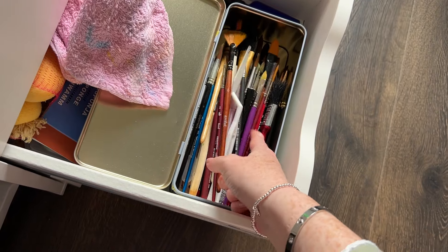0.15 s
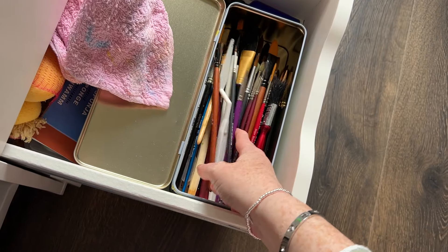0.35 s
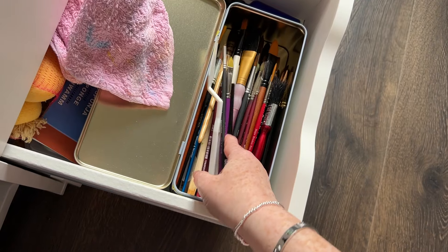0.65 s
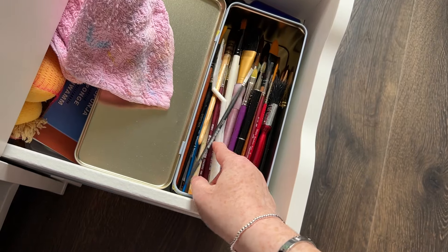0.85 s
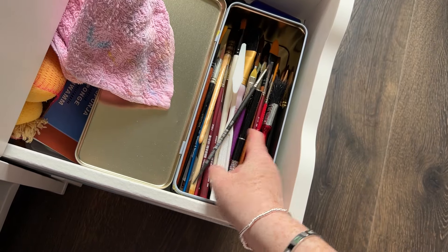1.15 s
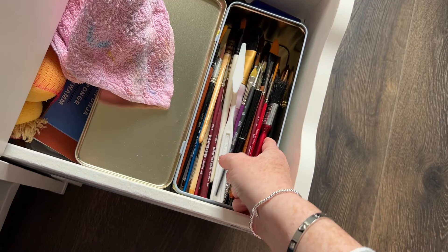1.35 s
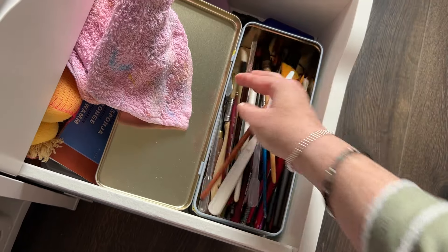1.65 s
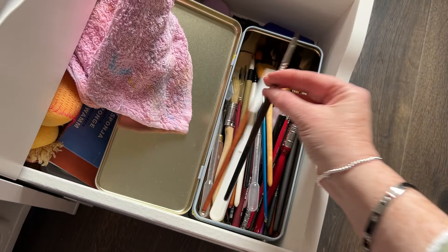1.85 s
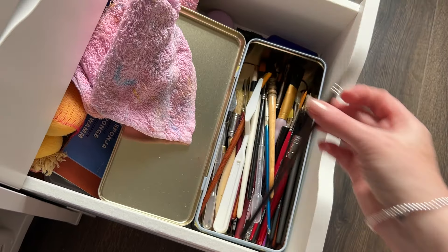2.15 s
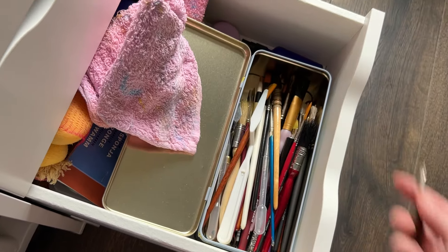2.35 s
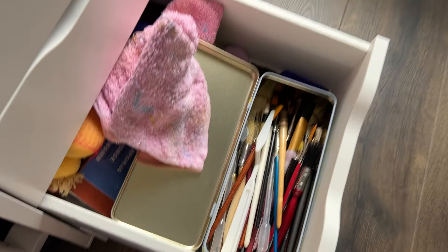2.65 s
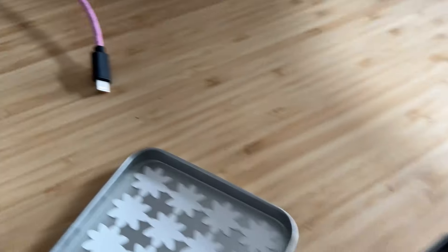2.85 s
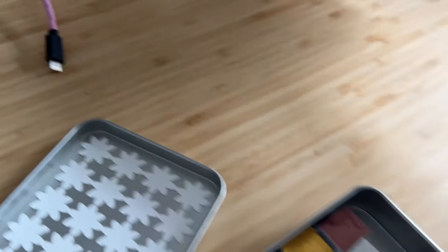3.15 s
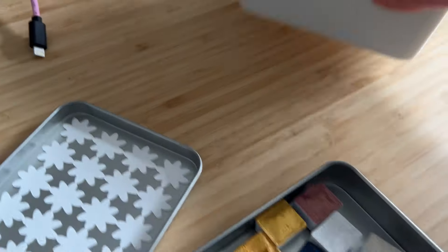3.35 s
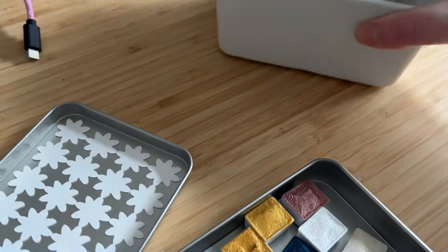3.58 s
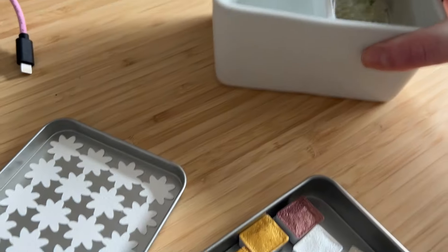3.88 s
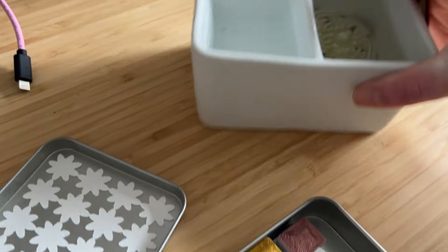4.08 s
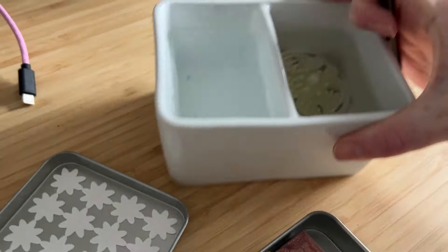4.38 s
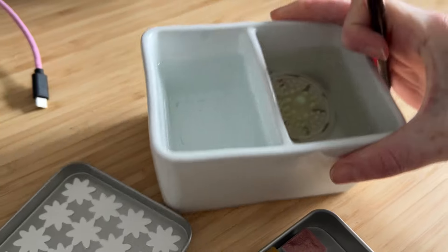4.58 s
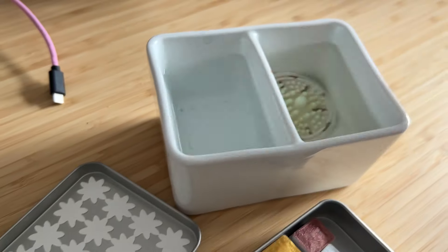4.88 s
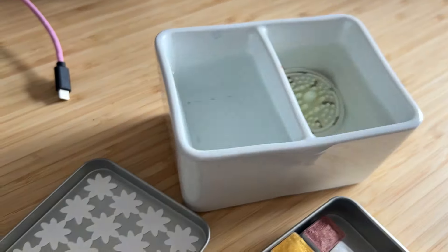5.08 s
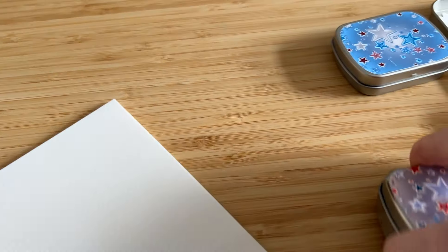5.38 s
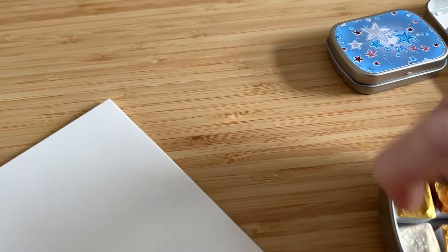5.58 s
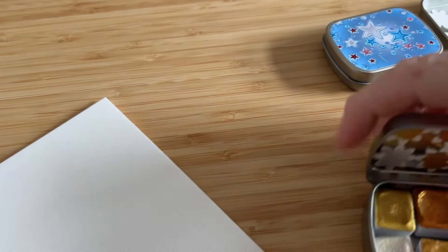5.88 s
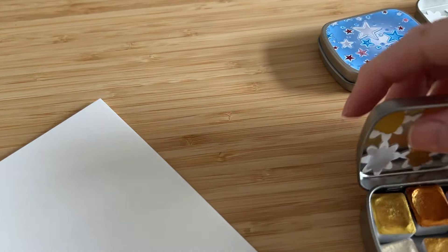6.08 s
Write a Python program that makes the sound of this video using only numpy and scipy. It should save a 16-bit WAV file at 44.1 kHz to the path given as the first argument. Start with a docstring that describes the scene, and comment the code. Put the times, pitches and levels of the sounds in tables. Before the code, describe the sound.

In a small quiet room, close up, fingers stir wooden and plastic paintbrushes in a metal tin in quick bursts of sharp clacks, with a low drawer rumble beneath. After a near-silent pause a ceramic water pot knocks hard on a wooden desk, grinds along it and stops. Lastly a small metal paint tin taps down, its lid is scraped loose and drops back with a crisp knock.

```python
"""Paintbrushes clack and clatter in a metal tin in a drawer: snaps through bright handle resonances,
hollow tin knocks, and dense random grains for the stirring, with a few sine pings of thin metal.
A ceramic water pot then knocks on a wooden desk, grinds along it and settles with a few faint thumps: decaying
desk modes, filtered bursts and grains that follow the speed. A small paint tin is put down and opened, and its
lid drops back: knocks, a scrape and a singing hinge. A small room, heard through two close microphone ports."""
import sys
import numpy as np
from scipy import signal
from scipy.fft import rfft, irfft
from scipy.io import wavfile

SR = 44100
rng = np.random.default_rng(int(sys.argv[2]) if len(sys.argv) > 2 else 0)


def put_to_file(sound):
    """Save the sound as 16-bit audio at rate SR, in the file named by the first command-line argument."""
    columns = np.atleast_2d(sound).T  # one column per channel
    safe = np.clip(columns, -1, 1)
    whole_steps = np.round(safe * 32767)
    wavfile.write(sys.argv[1], SR, whole_steps.astype(np.int16))


N = 274743
TIME = np.arange(N) / SR

# quiet room noise, spectral shape: freq_hz, level_db
FLOOR_SPECTRUM = [(55, 7), (250, -13), (600, -21.5), (1250, -14), (2300, -24.5), (6000, -35), (13000, -32),
                  (16000, -40)]
FLOOR_DB = -60
# low room rumble, spectral shape: freq_hz, level_db
FLOOR_RUMBLE_SPECTRUM = [(55, 5.5), (90, -3.5), (400, -37.5), (1500, -66)]

# resonances of one brush handle: multiple of its ring frequency, boost_db
HANDLE_RESONANCES = [(.52, 8), (1, 13), (1.6, 9)]
HANDLE_WIDTH_HZ = 430
# broad spectrum under the handle resonances: freq_hz, level_db
TICK_SPECTRUM = [(300, -23), (1500, -13.5), (3500, -11.5), (15500, -3.5)]
# bending modes of a free bar: multiple of the first
FREE_BAR_RATIOS = [1, 2.76, 5.4, 8.93, 13.3]
# resonances of the brush tin: freq_hz, width_hz, boost_db
BRUSH_TIN_RINGS = [(300, 40, 3.3), (528, 56, 4.6), (950, 87, 5), (1660, 61, 2.5), (2540, 170, 4.9)]

# strokes of the fingers through the brushes, levels ahead of the layer trims:
# start_s, length_s, clatter_db, drawer_rumble_db
STROKES = [(-0.02, 0.14, -33, -45), (.18, 0.11, -22, -43), (.435, 0.13, -25.5, -49.5),
           (.68, 0.066, -35, -47.5), (.77, 0.054, -24, -41.5), (.935, .13, -40, -44),
           (1.18, 0.069, -56, -55.5), (1.385, 0.2, -48, -67), (1.48, 0.12, -24, -35.5),
           (1.675, 0.056, -28.5, -41), (1.81, 0.068, -26.5, -35.5)]
# a stroke gathers the handles, then they settle; the drawer takes longer to come to rest
STROKE_ATTACK_S, SETTLE_T60_S, DRAWER_T60_S = 0.03, 0.098, 0.3
# stray ticks between handles: rate, level against the small knocks, range of their rings
STRAY_PER_S, STRAY_DB, STRAY_LOW_HZ, STRAY_HIGH_HZ = 150, -8.5, 6500, 9400
# broad spectrum of the small knocks: freq_hz, level_db
CLATTER_SPECTRUM = [(40, -16), (150, -6), (400, 3), (1000, -2), (2000, -7), (4500, -6), (8000, -10),
                    (15000, -20)]
# broad spectrum of the jostled drawer: freq_hz, level_db
DRAWER_SPECTRUM = [(30, -14.5), (70, 6.5), (130, -4.0), (300, -1), (450, -5.0), (900, -32.0), (3000, -60.5)]

# clearest clacks of brush handles; the knock is that of what they lie against:
# start_s, tick_db, knock_db, ring_hz
BRUSH_CLACKS = [(0.039, -25.5, -45.5, 6630), (0.088, -17.5, -25.5, 6530), (0.1753, -8, -24, 7258),
                (0.235, -23, -17.5, 7746), (0.2596, -19, -16.5, 8810), (0.448, -7.5, -8.5, 9360),
                (0.451, -13.5, -2.5, 8070), (0.46, -15.5, -27, 9260), (0.536, -18, -25.5, 7356),
                (0.556, -27.5, -14, 9170), (0.72, -35.5, -18, 6670), (0.7602, -15, -32, 8034),
                (0.7978, -27.5, -22, 7776), (0.836, -26, -16.5, 7870), (0.867, -26, -40.5, 6650),
                (0.9742, -23, -44.5, 7780), (1.015, -42, -26.5, 7570), (1.031, -33, -31, 7210),
                (1.052, -28, -26.5, 6630), (1.187, -50, -34.5, 7700), (1.505, -26.5, -30, 8790),
                (1.5514, -11, -24.5, 8380), (1.677, -49, -21.5, 6600), (1.716, -19.5, -33.5, 9070),
                (1.843, -44.5, -20, 7000), (1.9405, -20.5, -19, 8500), (1.998, -36.5, -33.5, 8120),
                (3.0281, -44, -70.5, 9410), (3.422, -65.5, -57, 8620), (4.0103, -35, -26.5, 9300),
                (4.4934, -23.5, -20, 7860), (4.6136, -23, -25, 9070)]
SNAP_T60_S = 0.013
# broad spectrum of the hollow knock: freq_hz, level_db
BRUSH_TIN_SPECTRUM = [(40, -23.5), (120, -17), (220, -9.5), (450, 2), (800, -5), (1500, -2.5), (2100, -7.5),
                      (3000, -5), (5000, -4.5), (15000, -23)]
# light metallic pings: start_s, pitch_hz, level_db, t60_s
PINGS = [(1.186, 4950, -52, .3), (1.94, 3058, -41, .14), (3.105, 2900, -53, .08)]

# modes of the desk top before damping: freq_hz, level_db, t60_s
DESK_MODES = [(64.6, -8, .2), (92, -6, .1), (120, -1, .4), (167, -4, .3), (198, -4, .14), (283, -2, .22),
              (325, -7, .18), (359, -5, .14), (440, -2, .12), (538, -6, .1)]
# the pot meeting the desk: start_s, thump_db, crack_db, brightness_hz, factor on the desk's ring time
POT_KNOCKS = [(3.4886, -5.5, -4.5, 4200, 0.98), (3.7102, -12, -18.5, 700, 0.79),
              (3.743, -7.5, -9, 2440, 0.72), (3.828, -22, -29.5, 1180, 1), (4.745, -43, -64.5, 297.6, 0.47),
              (4.885, -50, -81.5, 300, 0.17), (4.94, -54, -80.5, 300, 0.17)]
# broad spectrum of the pot: freq_hz, level_db
POT_SPECTRUM = [(50, -10.5), (200, -8), (450, 10.5), (750, 2), (1100, -1), (1700, -6.5), (2800, -15),
                (4500, -22), (7000, -30.5), (15000, -36)]
# the pot is pushed once, slows down and stops: time_s, speed (0 to 1)
PUSH = [(3.84, 0.2), (3.95, .75), (4.17, 0.9), (4.48, .45), (4.64, 0.44), (4.70, 0.09)]
# layers of the slide: level at speed 1, and the power of speed that each follows
GRIND_DB, GRIND_POWER = -23.5, 1.37
GRIT_DB, GRIT_POWER = -38.5, 1.9
SHUDDER_DB, SHUDDER_POWER = -30.5, 0.54
# broad spectrum of the grind: freq_hz, level_db
GRIND_SPECTRUM = [(80, -18), (250, -7.5), (450, 1), (700, -3.5), (1100, -5), (2400, -13), (5000, -29),
                  (15000, -49.5)]
# resonances of the grind: freq_hz, width_hz, boost_db
GRIND_RINGS = [(474, 55, 9), (791, 30, 5), (1010, 40, 5), (1670, 50, 4), (2170, 150, 3)]
# broad spectrum of the fine grit: freq_hz, level_db
GRIT_SPECTRUM = [(1500, -18), (4500, 4.5), (6700, -2.5), (7800, -6), (8400, -5), (9100, -5), (15500, 0)]
# broad spectrum of the shaken desk: freq_hz, level_db
SHUDDER_SPECTRUM = [(30, -28.5), (70, -12.5), (125, -12), (200, -1.0), (350, -20.5), (1500, -67.0)]
# resonances of the shaken desk: freq_hz, width_hz, boost_db
SHUDDER_RINGS = [(108.5, 7.9, 27.8), (170.0, 12, 15)]

# the paint tin and its lid: start_s, thump_db, crack_db, hollow_hz of the struck part, rattle_t60_s
TIN_KNOCKS = [(5.185, -31, -27.5, 2274, 0.236), (5.3145, -37, -29, 810, 0.03),
              (5.345, -53.5, -41, 2260, 0.044), (5.658, -44.5, -61.5, 600, 0.035),
              (5.863, -28.5, -15.5, 1258, 0.09), (5.893, -26, -25.5, 4030, 0.024)]
# broad spectrum of the paint tin: freq_hz, level_db
PAINT_TIN_SPECTRUM = [(50, -8.5), (180, -0.5), (550, -5.5), (1300, -10), (3000, -10), (3700, -18),
                      (5000, -18.5), (15000, -39)]
# resonances of the paint tin: freq_hz, width_hz, boost_db
PAINT_TIN_RINGS = [(547.8, 27, 13.3), (820, 40, 7.3), (1230, 17, 3.6), (1414, 20.8, 1.7), (2160, 68, 3.74),
                   (2890, 90, 7), (4270, 149, 5.9)]
# fingers scraping at the lid: start_s, length_s, level_db
LID_SCRAPES = [(5.29, .06, -43), (5.50, .045, -41), (5.72, 0.27, -49)]
SCRAPE_ATTACK_S, SCRAPE_T60_S = 0.022, 0.398
# broad spectrum of the scrape: freq_hz, level_db
SCRAPE_SPECTRUM = [(60, 6.5), (250, 6.5), (550, 4.0), (1300, -2.5), (2600, -2.5), (4500, -15),
                   (8000, -21.0), (15000, -21.0)]
# the lid turning on its hinge: start_s, length_s, level_db
HINGE_TURNS = [(5.59, 0.055, -49), (6.01, .16, -53)]
HINGE_ATTACK_S, HINGE_T60_S = 0.0302, 0.2
# broad spectrum of the singing lid: freq_hz, level_db
LID_SPECTRUM = [(200, -6), (1200, -6.5), (8000, -16.5), (15000, -27.5)]
# resonances of the thin lid: freq_hz, width_hz, boost_db
LID_RINGS = [(1220, 110, 13), (2150, 140, 8), (2980, 180, 13), (4220, 320, 12), (5200, 260, 8)]

# reverberation time: freq_hz, t60_s
ROOM_T60 = [(100, 0.54), (400, 0.29), (1500, 0.33), (5000, 0.34), (9000, 0.28), (15000, .28)]
# colour of the reverberation: freq_hz, level_db
ROOM_SPECTRUM = [(100, -3), (500, 2), (4000, 2), (8000, -2), (15000, -6)]
# likeness of the two ports: freq_hz, likeness (0 unrelated, 1 identical)
PORT_LIKENESS = [(100, 0.98), (300, 0.97), (650, 0.42), (1500, 1), (2800, 0.17), (5000, .6), (7000, 1)]
# phase by which the left port leads the right: freq_hz, lead_rad
PORT_LEAD = [(20, 0), (300, -.2), (650, -1.1), (950, -.35), (1800, 0), (2900, 2.1), (3900, 1), (5100, 1.2),
             (6000, 3.14), (8050, 6.28), (10300, 9.42), (12600, 12.4), (14800, 15.7)]
EDGE_HZ = 15800  # upper band limit


def amp(db):
    """Decibels to gain."""
    return 10 ** (np.asarray(db) / 20)


def read(points, hz):
    """Reads a spectrum table on a log-frequency axis."""
    table_hz, value = np.transpose(points)
    return np.interp(np.log(hz + 1), np.log(table_hz + 1), value)


def add(mix, start_s, sound):
    """Mixes a sound in at a time."""
    part = mix[:, round(start_s * SR):][:, :sound.shape[1]]
    part += sound[:, :part.shape[1]]


def body(spectrum, rings=(), size=4096):
    """Minimum-phase response of a sounding body, energy 1: a broad spectrum with resonances on it."""
    hz = abs(np.fft.fftfreq(size, 1 / SR))
    gain = amp(read(spectrum, hz))
    for ring_hz, width_hz, boost_db in rings:
        gain = gain * (1 + (amp(boost_db) - 1) / (1 + (2 * (hz - ring_hz) / width_hz) ** 2))
    # the phase that follows from the log gain makes the response causal
    causal_spectrum = np.exp(np.conj(signal.hilbert(np.log(gain))))
    response = np.fft.ifft(causal_spectrum).real[:size // 2]
    return response[None] / np.linalg.norm(response)


def through(x, response):
    """Convolution that keeps the length."""
    return signal.fftconvolve(x, response, axes=1)[:, :x.shape[1]]


def dying(t60, size=8192):
    """Exponential decay by 60 dB in t60 seconds."""
    return np.exp(-np.log(1000) * np.arange(size) / SR / t60)


def burst(t60):
    """A dying puff of dense vibration, in two unrelated rows."""
    fade = dying(t60)
    return rng.standard_normal((2, len(fade))) * fade


def lasting(x, seconds):
    """Scales a hit to the energy of a unit-rms sound of that duration."""
    return x * np.sqrt(seconds * SR / (x ** 2).sum(1, keepdims=True))


def grains(per_s, spread_db):
    """Tiny slips of unequal size at random instants, near unit rms."""
    size = amp(spread_db * np.minimum(rng.exponential(1, N), 4))
    size = size * (rng.random(N) < per_s / SR)
    return size * rng.standard_normal((2, N)) / size.std()


def gestures(rows, attack_s, t60, level_column=2):
    """Gain over time: each row's gesture swells from its start, holds to its length and dies away."""
    gain = np.zeros(N)
    for row in rows:
        t = TIME - row[0]
        swell = np.clip(t / attack_s, 0, 1)
        fade = np.exp(-np.log(1000) * np.maximum(t - row[1], 0) / t60)
        gain += amp(row[level_column]) * swell * fade
    return gain


def floor():
    """Faint steady room noise, and an uneven low rumble made of sparse grains."""
    air = amp(FLOOR_DB) * through(rng.standard_normal((2, N)), body(FLOOR_SPECTRUM))
    rumble = through(grains(per_s=170, spread_db=-0.5), body(FLOOR_RUMBLE_SPECTRUM))
    return air + amp(-60.5) * rumble


def handle(ring_hz):
    """The bright, broad resonances of one brush handle."""
    return body(TICK_SPECTRUM, [(ratio * ring_hz, HANDLE_WIDTH_HZ, db) for ratio, db in HANDLE_RESONANCES])


def stirring(count=8):
    """Many handles knock and tick, each with its own modes; the tin passes the jostling to the drawer."""
    clatter = np.zeros((2, N))
    for _ in range(count):
        first_hz = rng.uniform(300, 900)
        bending = [(first_hz * ratio, 45 * np.sqrt(ratio), 11) for ratio in FREE_BAR_RATIOS]
        knocks = through(grains(per_s=55, spread_db=0.0), body(CLATTER_SPECTRUM, BRUSH_TIN_RINGS + bending))
        stray_handle = handle(rng.uniform(STRAY_LOW_HZ, STRAY_HIGH_HZ))
        ticks = through(grains(per_s=STRAY_PER_S / count, spread_db=2.0), stray_handle)
        clatter += (knocks + amp(STRAY_DB) * ticks) / np.sqrt(count)
    rumble = through(grains(per_s=620, spread_db=2.0), body(DRAWER_SPECTRUM))
    jostle = gestures(STROKES, STROKE_ATTACK_S, SETTLE_T60_S)
    shake = gestures(STROKES, STROKE_ATTACK_S, DRAWER_T60_S, level_column=3)
    return amp(-2) * jostle * clatter + amp(0.5) * shake * rumble


def brushes():
    """Each contact is a snap that rings the handle for a moment, and a hollow knock from below."""
    out = np.zeros((2, N))
    for start_s, tick_db, knock_db, ring_hz in BRUSH_CLACKS:
        snap = lasting(through(burst(SNAP_T60_S), handle(ring_hz)), 0.0074)
        # every handle adds its own low bending modes to the knock
        bending = [(hz * rng.uniform(0.7, 1.2), 70, 12) for hz in (420, 1150, 2300)]
        hollow = through(burst(0.059), body(BRUSH_TIN_SPECTRUM, BRUSH_TIN_RINGS + bending))
        hollow = lasting(hollow, 0.0044)
        add(out, start_s, amp(tick_db) * snap + amp(knock_db) * hollow)
    return out


def pings():
    """Thin metal rings as a few dying sines, at a random phase in each row."""
    out = np.zeros((2, N))
    for start_s, pitch_hz, level_db, t60 in PINGS:
        fade = dying(t60, size=20000)
        cycles = pitch_hz * np.arange(len(fade)) / SR + rng.random((2, 1))
        add(out, start_s, amp(level_db) * fade * np.sin(2 * np.pi * cycles))
    return out


def desk(sustain, size=24000):
    """The desk top's modes answer a blow, shorter under weight; long waves reach both ports alike."""
    t = np.arange(size) / SR
    ring = np.zeros(size)
    for k, (hz, db, t60) in enumerate(DESK_MODES):
        # neighbouring modes start in opposite polarity
        ring += (-1) ** k * amp(db) * dying(t60 * sustain, size) * np.sin(2 * np.pi * hz * t)
    return np.array([ring, np.zeros(size)])


def knock(colour, thump_db, crack_db, t60, sustain):
    """A thing meets the desk: the top thumps, the thing cracks and rattles briefly."""
    crack = through(burst(0.0078) * amp(5.5) + burst(t60), colour)
    sound = amp(thump_db) * desk(sustain)
    add(sound, 0, amp(crack_db) * lasting(crack, 0.014))
    return sound


def pot_slide():
    """The pot grinds over the wood and shakes the desk; the faster, the louder and grittier."""
    speed = np.maximum(np.interp(TIME, *np.transpose(PUSH), left=0, right=0), 0)
    grind = through(grains(per_s=3900, spread_db=1.0), body(GRIND_SPECTRUM, GRIND_RINGS))
    grit = through(grains(per_s=9000, spread_db=0.3), body(GRIT_SPECTRUM))
    # speed drives the desk ahead of its resonances, so they ring on
    push = speed ** SHUDDER_POWER * grains(per_s=600, spread_db=1.8)
    shudder = through(push, body(SHUDDER_SPECTRUM, SHUDDER_RINGS))
    slide = amp(GRIND_DB) * speed ** GRIND_POWER * grind
    slide += amp(GRIT_DB) * speed ** GRIT_POWER * grit
    return slide + amp(SHUDDER_DB) * shudder


def pot():
    """The pot knocks on the desk, slides, and settles with faint thumps, each blow with its own brightness."""
    out, colour = np.zeros((2, N)), body(POT_SPECTRUM)
    for start_s, thump_db, crack_db, bright_hz, sustain in POT_KNOCKS:
        lowpass = signal.butter(1, min(bright_hz, SR / 4), fs=SR)
        blow_colour = signal.lfilter(*lowpass, colour)
        add(out, start_s, knock(blow_colour, thump_db, crack_db, t60=0.097, sustain=sustain))
    return out + pot_slide()


def paint_tin():
    """The tin is put down, its lid is scraped loose and drops back; the hinge makes the lid sing."""
    out = np.zeros((2, N))
    for start_s, thump_db, crack_db, hollow_hz, t60 in TIN_KNOCKS:
        colour = body(PAINT_TIN_SPECTRUM, PAINT_TIN_RINGS + [(hollow_hz, 400, 10)])
        add(out, start_s, knock(colour, thump_db, crack_db, t60, sustain=0.71))
    scrape = through(grains(per_s=3000, spread_db=2.2), body(SCRAPE_SPECTRUM, PAINT_TIN_RINGS))
    singing = through(rng.standard_normal((2, N)), body(LID_SPECTRUM, LID_RINGS))
    out += gestures(LID_SCRAPES, SCRAPE_ATTACK_S, SCRAPE_T60_S) * scrape
    return out + gestures(HINGE_TURNS, HINGE_ATTACK_S, HINGE_T60_S) * singing


def room(size=30000):
    """A diffuse tail that builds up within milliseconds, each band dying at its own speed."""
    hz, t, bands = signal.stft(rng.standard_normal((2, size)), SR, nperseg=256)
    bands = bands * np.exp(-np.log(1000) * t / read(ROOM_T60, hz)[:, None])
    bands = bands * amp(read(ROOM_SPECTRUM, hz))[:, None]
    tail = signal.istft(bands, SR, nperseg=256)[1][:, :size]
    tail = tail * (1 - dying(0.011, size))
    return tail / np.linalg.norm(tail[0])


def ports(x):
    """Row one is the sound both ports share, row two what differs; the left leads by a phase."""
    hz = np.fft.rfftfreq(N, 1 / SR)
    like = np.clip(read(PORT_LIKENESS, hz), 0, 1)
    turn = np.exp(0.5j * read(PORT_LEAD, hz))  # half the lead goes to each port
    shared, apart = rfft(x) * np.sqrt([(1 + like) / 2, (1 - like) / 2])
    return irfft(np.array([(shared + apart) * turn, (shared - apart) / turn]), N)


def scene():
    """Drawer and desk in the same small room."""
    background = floor()
    drawer = stirring() + brushes() + pings()
    water_pot = pot()
    tin = paint_tin()
    send = amp(-11.0) * drawer + amp(-12.5) * water_pot + amp(-12.5) * tin
    wet = through(send, room())
    return ports(drawer + water_pot + tin + wet + background)


def record(dry):
    """The microphone loses the deepest bass and clips at full scale; then the band limit."""
    heard = signal.lfilter(*signal.butter(2, 44, "high", fs=SR), dry)
    edge = signal.firwin(255, EDGE_HZ, window=("kaiser", 7), fs=SR)
    return signal.oaconvolve(np.clip(heard, -1, 1), edge[None], "same")


dry = scene()
out = record(dry)
put_to_file(out)
```